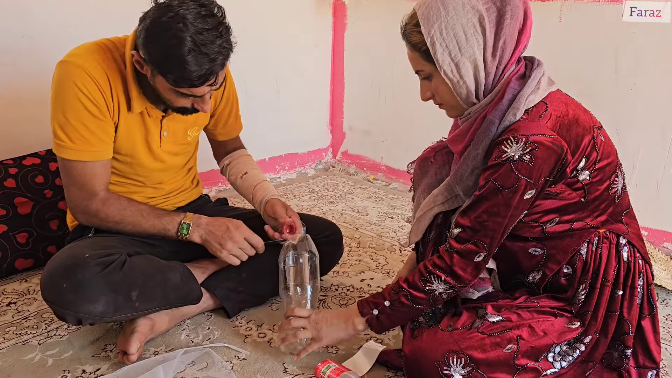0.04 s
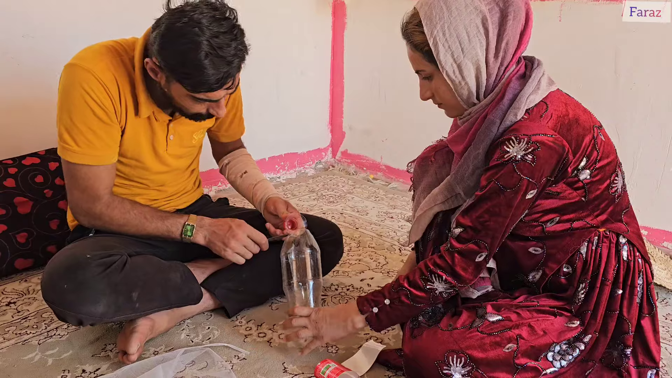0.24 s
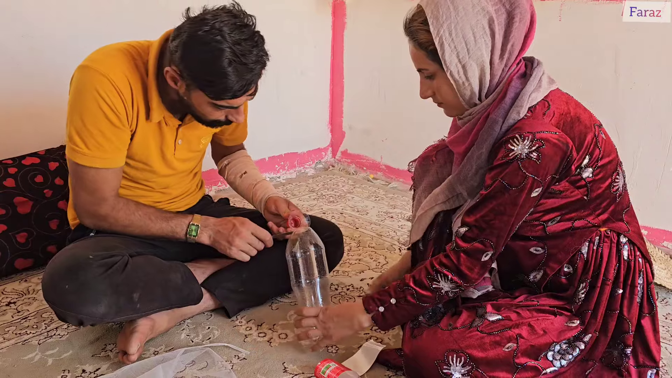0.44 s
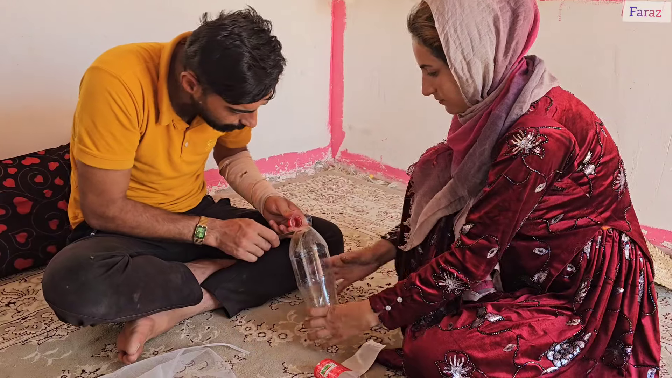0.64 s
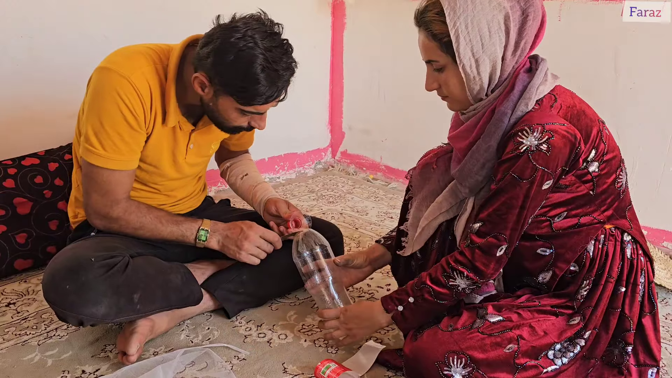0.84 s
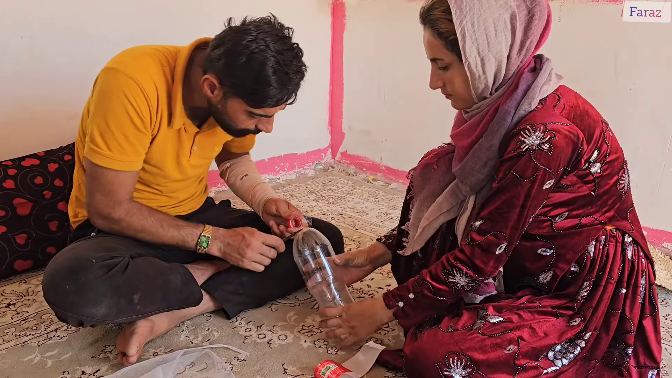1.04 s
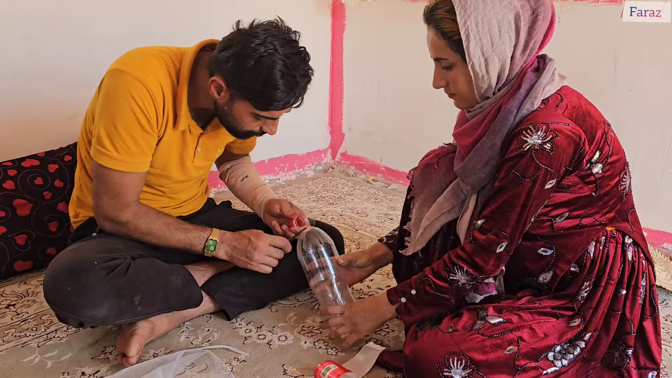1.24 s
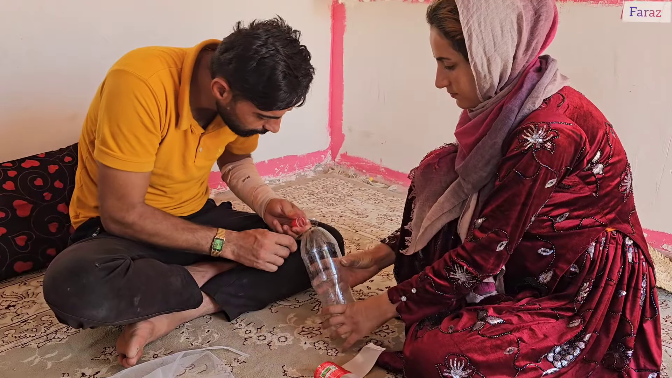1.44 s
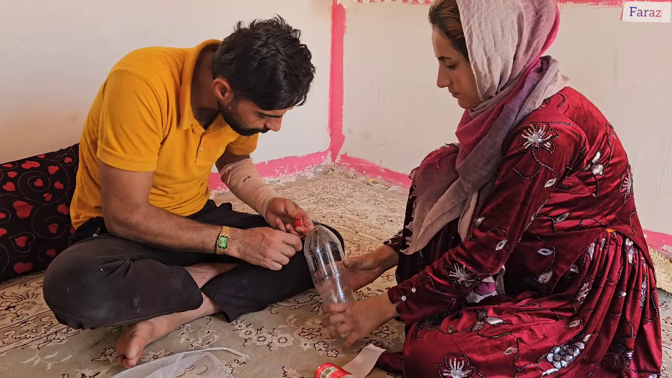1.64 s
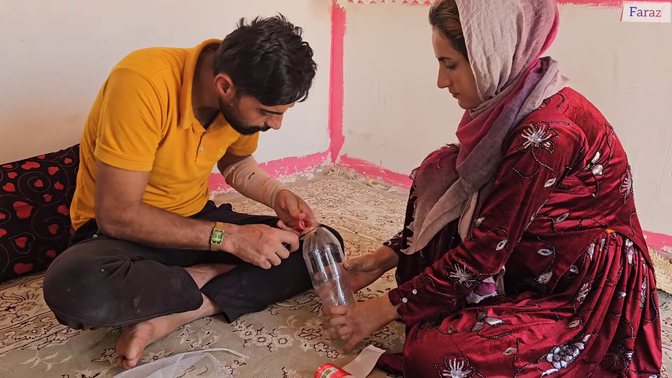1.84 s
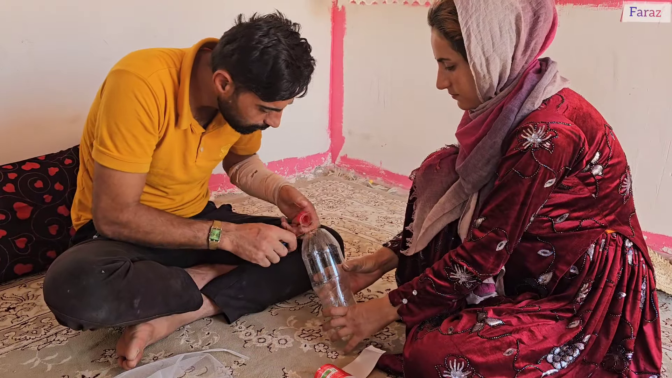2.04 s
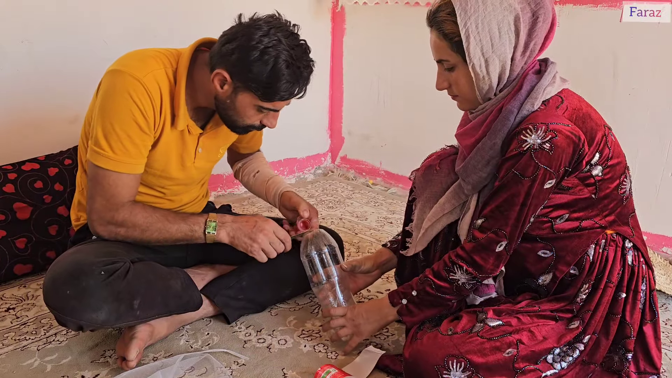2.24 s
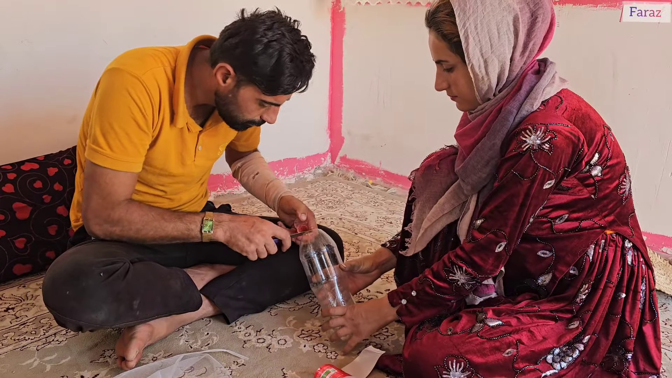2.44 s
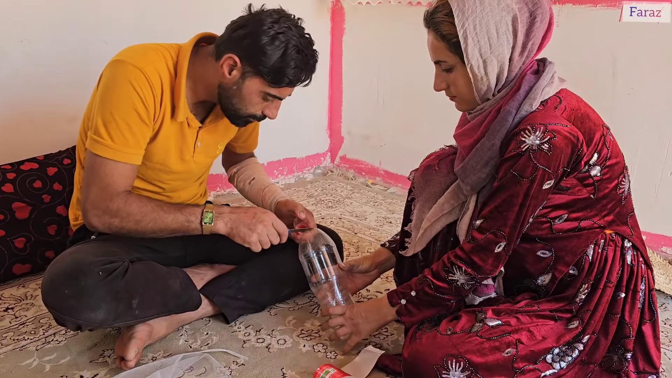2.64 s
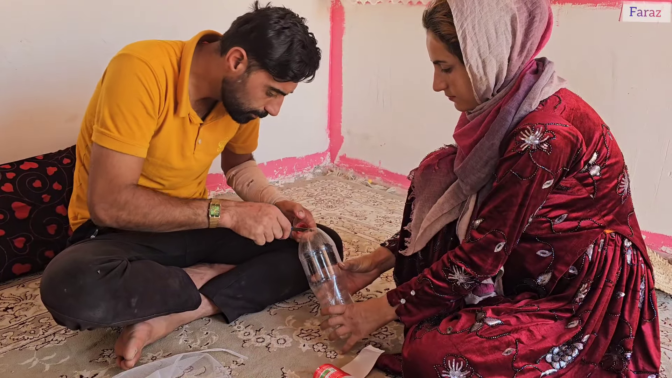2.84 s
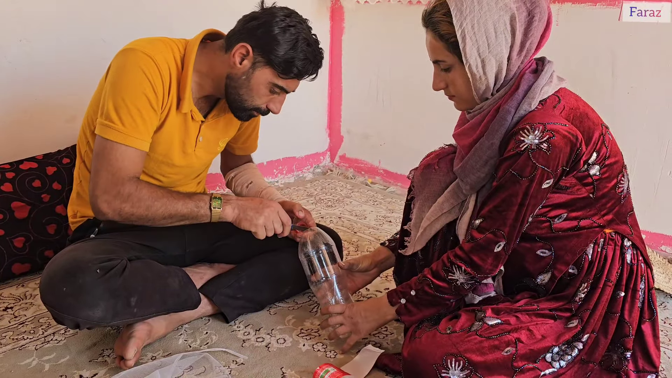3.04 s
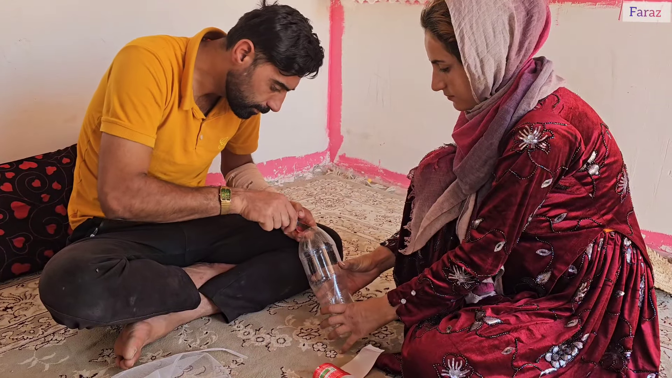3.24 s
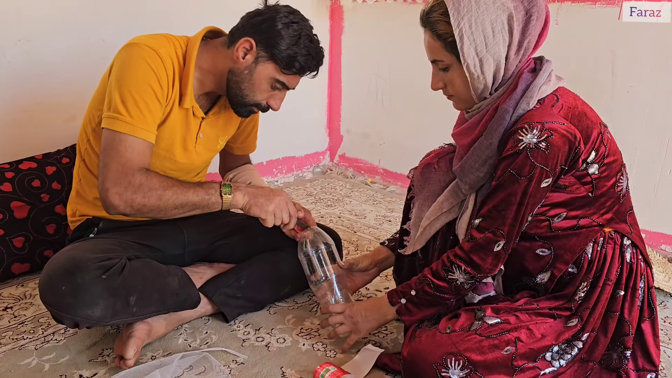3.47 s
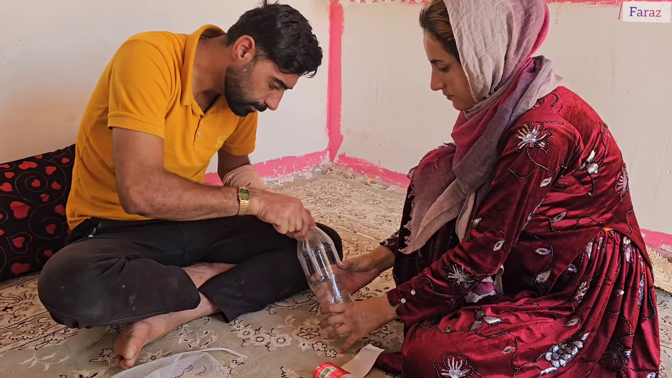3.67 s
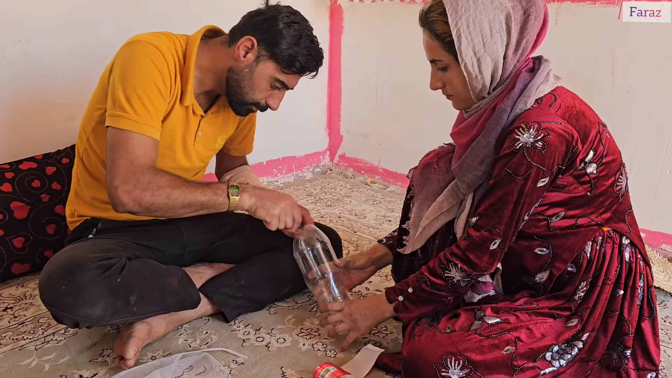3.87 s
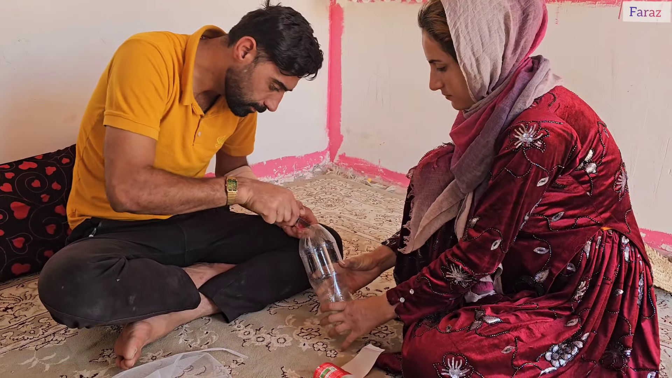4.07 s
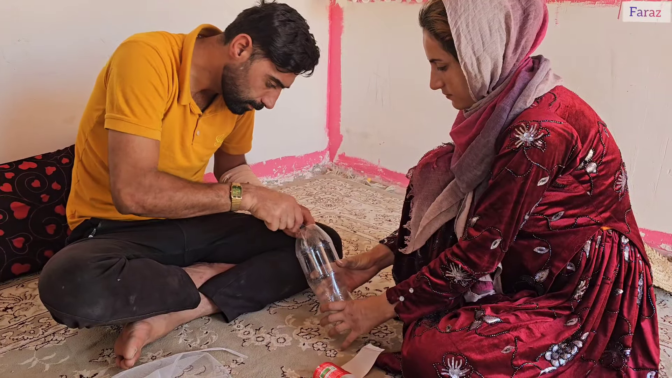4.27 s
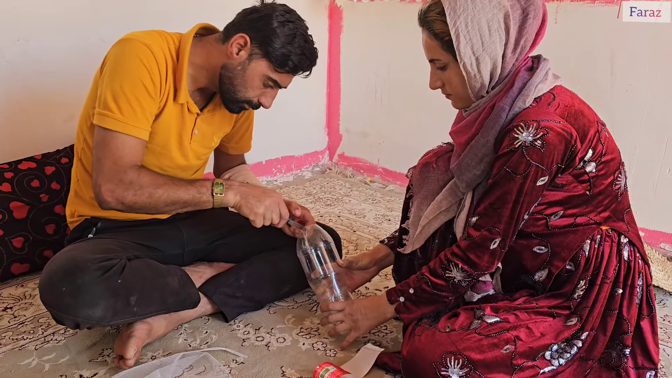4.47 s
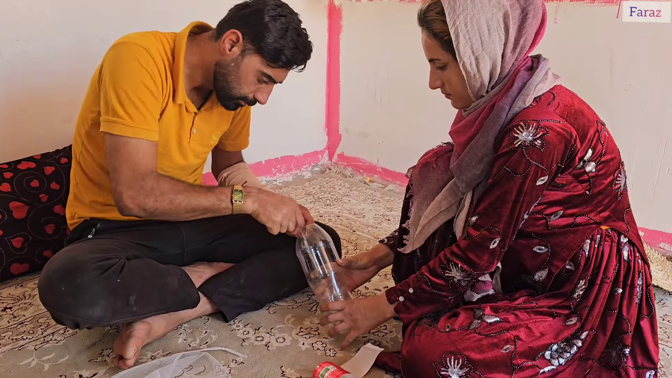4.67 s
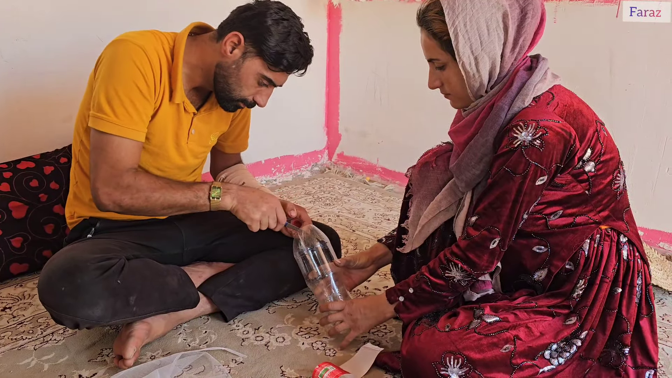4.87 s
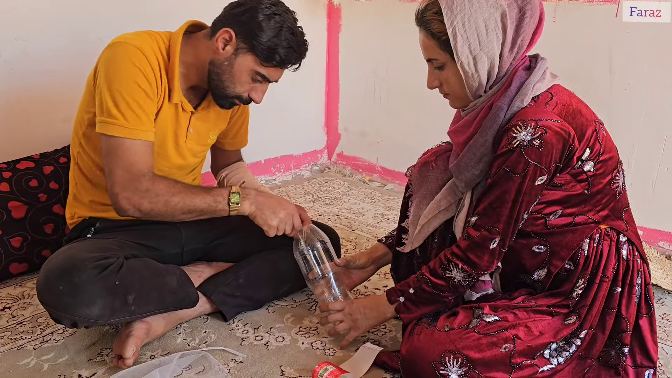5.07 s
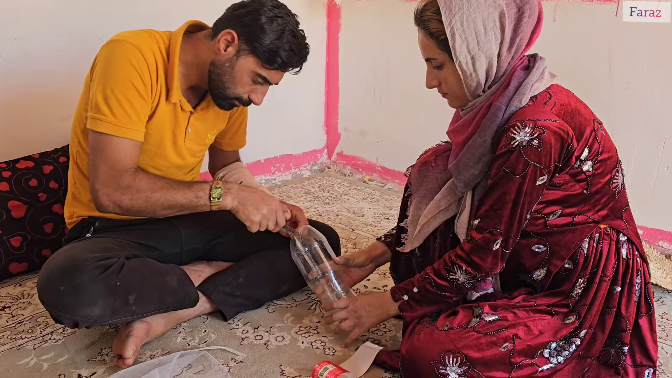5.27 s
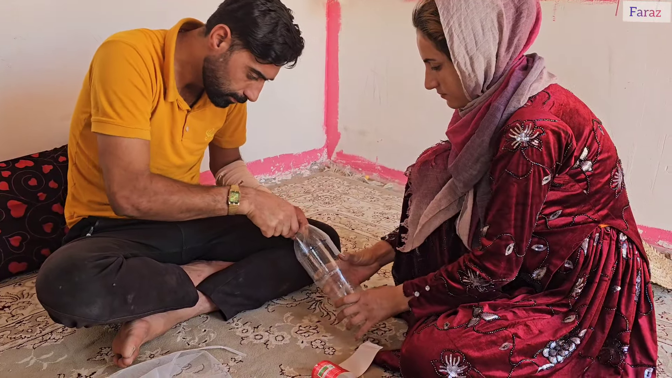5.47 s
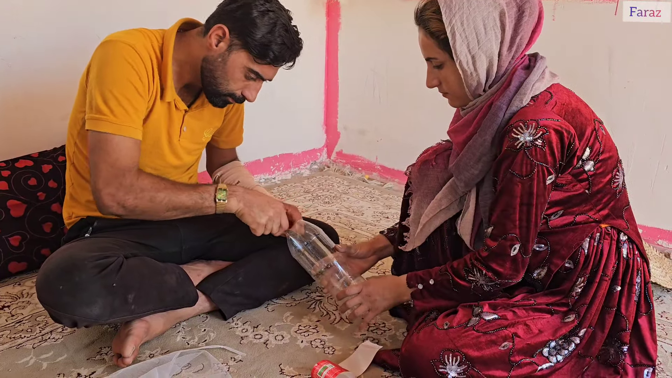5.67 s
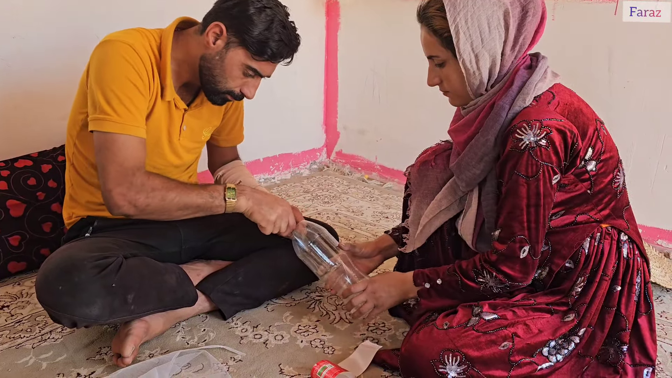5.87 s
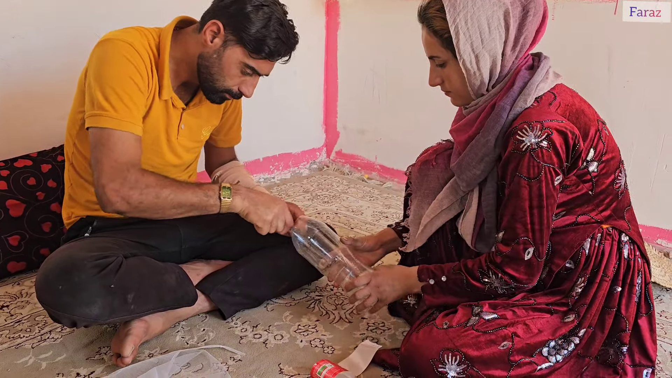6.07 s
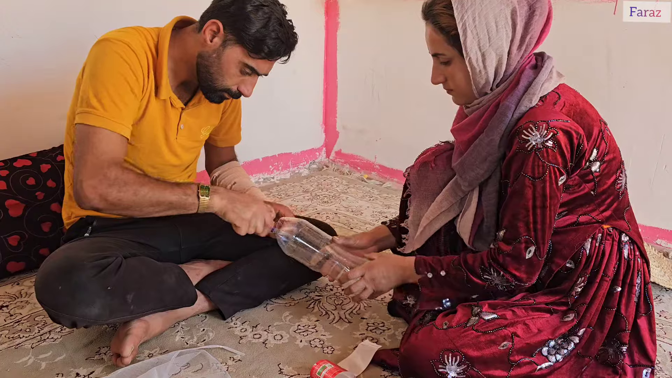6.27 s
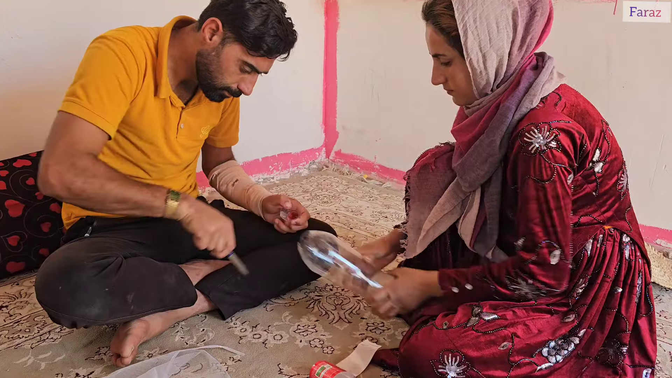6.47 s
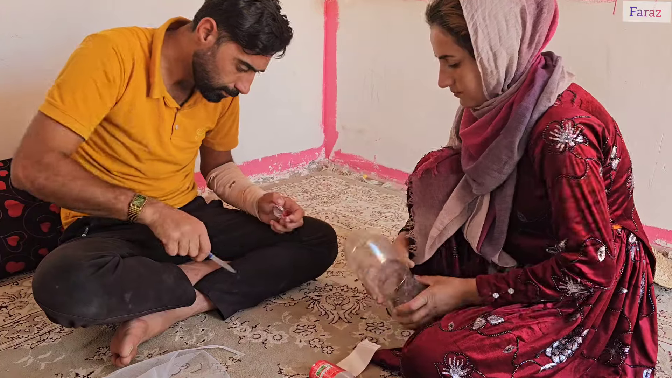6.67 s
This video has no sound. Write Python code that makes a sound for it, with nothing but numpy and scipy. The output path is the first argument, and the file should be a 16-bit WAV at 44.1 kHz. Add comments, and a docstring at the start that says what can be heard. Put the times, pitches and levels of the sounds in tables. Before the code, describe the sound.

A quiet small room with a faint stereo hush. From 0 to 0.6 s a blade and hands brush an empty plastic bottle almost inaudibly. Small knocks come at about 0.7 and 0.8 s, and a clear hollow click at 1.24 s. Soft low bumps and faint rubbing continue to 2.3 s, where a light scrape-tick falls, then a few dull creaks and touches. At 3.13 s a short toothy buzz sounds, with ticks near 3.4. From 3.54 s loud fast sawing starts: gritty rasps four or five times a second, with a bright snap at 3.85, each stroke making the air inside hum low and hollow. It runs to about 5.5 s. After a brief lull, uneven catches, pops and crackles from 5.85 s break through, with a boomy crunch at 6.36 and a crisp snap at 6.55 s, fading into hush.

```python
"""A serrated knife saws into the shoulder of an empty plastic bottle: teeth pluck the wall, rubbing is noise.
Hands and blade first only feel around; then come fast strokes, and the blade breaks through with snaps.
Plucks, noise and blows drive resonances of wall, rim, panels, blade and air; the air booms higher once slit.
Sine notes sing in the neck. A small bare room answers with decaying noise over a quiet stereo hush."""
import sys
import numpy as np
from scipy import signal
from scipy.fft import rfft, irfft, next_fast_len
from scipy.io import wavfile
from scipy.ndimage import uniform_filter1d, map_coordinates

SR = 44100
rng = np.random.default_rng(int(sys.argv[2]) if len(sys.argv) > 2 else 0)


def generate_wav(sig):
    """Save sig (samples, or channels by samples) to the path in sys.argv[1] as 16-bit PCM at SR."""
    pcm = np.round(np.clip(np.atleast_2d(sig).T, -1, 1) * 32767).astype(np.int16)
    wavfile.write(sys.argv[1], SR, pcm)


N = 295911


def amp(db):
    """Gain of a level in dB."""
    return 10 ** (np.asarray(db) / 20)


def unit(x):
    """Scaled to rms 1."""
    return x / np.sqrt(np.mean(x ** 2) + 1e-20)


def along(points, hz):
    """(f/Hz, value) points interpolated on a log frequency axis."""
    f, v = np.transpose(points)
    return np.interp(np.log(hz + 1), np.log(f + 1), v)


def filtered(x, response):
    """x times a complex response of frequency."""
    m = next_fast_len(N + SR // 2)
    return irfft(rfft(x, m) * response(np.fft.rfftfreq(m, 1 / SR)), m)[..., :N]


def through(x, shape):
    """x through a response normalized to leave white noise at its level."""
    def normalized(hz):
        gain = shape(hz)
        return gain / np.sqrt(np.mean(np.abs(gain) ** 2))
    return filtered(x, normalized)


def modes(table):
    """Causal response of parallel resonances with alternating signs."""
    def response(hz):
        total = 0
        for k, (center_hz, width_hz, db) in enumerate(table):
            damping = 1j * hz * width_hz
            total = total + (-1) ** k * amp(db) * damping / (center_hz ** 2 - hz ** 2 + damping)
        return total
    return response


def wobble(rate):
    """Smooth random curve, rate knots/s."""
    knots = rng.standard_normal(int(N * rate / SR) + 4)
    return map_coordinates(knots, [np.arange(N) * rate / SR])


def wavering(depth):
    """Time in s that runs slightly unevenly, so that tones waver in pitch."""
    return np.cumsum(1 + depth * wobble(rate=44)) / SR


def joined(tables):
    """Per-sample columns of successive tables; each holds its last row until the next starts."""
    rows = []
    for table, after in zip(tables, tables[1:] + [[(N / SR,)]]):
        hold_end_s = max(after[0][0] - 1 / 2000, table[-1][0])
        rows += [*table, (hold_end_s, *table[-1][1:])]
    s, *cols = np.transpose(rows)
    return [np.interp(np.arange(N) / SR, s, c) for c in cols]


# hush spectrum: f/Hz, relative density/dB
HUSH_SPECTRUM = [(12, -37), (20, 5), (49, 1.5), (241, 7), (678, -13.5), (825, -2), (923, -9.5), (2140, -10),
                 (2530, -15.5), (2910, -13), (7310, -15), (10800, -36), (16000, -21)]
HUSH_MID_DB = -71


def hush():
    """Quiet room and microphone: shaped noise, near mono in the bass, unrelated in the treble."""
    mid, side = through(rng.standard_normal((2, N)), lambda hz: amp(along(HUSH_SPECTRUM, hz)))
    side = filtered(side, lambda hz: hz / (hz + 400))
    return amp(HUSH_MID_DB) * np.array([mid + side, mid - side])


# room over direct sound: f/Hz, level/dB
WET_LEVEL = [(60, -22), (300, -17), (560, 0), (1200, -6), (3000, -3), (8000, 3)]
# room decay: f/Hz, t60/s
ROOM_T60 = [(200, 0.22), (1000, 0.082), (4000, 0.062), (12000, 0.031)]


def room(x):
    """Diffuse answer of the walls: decaying noise, a new tail for every short stretch of sound."""
    x = filtered(x, lambda hz: amp(along(WET_LEVEL, hz)))
    out, step = np.zeros((2, N + SR)), SR // 4
    fade = np.interp(np.arange(step + 256), [0, 256, step, step + 256], [0, 1, 1, 0])
    predelay = 200  # samples
    for at in range(0, N, step):
        hz, t, z = signal.stft(rng.standard_normal((2, SR // 3)), SR, nperseg=256)
        decay = amp(-60 * t / along(ROOM_T60, hz)[:, None])
        tail = signal.istft(z * decay, SR, nperseg=256)[1]
        tail = tail / np.linalg.norm(tail[0])
        piece = x[at:at + len(fade)]
        piece = piece * fade[:len(piece)]
        wet = signal.fftconvolve(piece[None], tail, axes=1)
        start = at + predelay
        out[:, start:start + wet.shape[1]] += wet
    return out[:, :N]


# notes of the air in the neck: loudest t/s, nominal f/Hz, nominal level/dB, swell/(dB/s), fade/(dB/s)
NECK_NOTES = [(0.666, 217.7, -47.5, 300.4, 63.7), (0.826, 225, -52, 1000, 500),
              (0.862, 217.6, -52, 756, 83.7), (1.17, 217, -56, 89.5, 163.4),
              (1.238, 218.9, -47.5, 3074, 148.1), (1.5, 210, -42.5, 136, 187),
              (1.64, 208.8, -47, 269.9, 151), (1.72, 214, -51, 149, 60.7), (1.79, 212, -62, 200.3, 220),
              (1.85, 350, -72, 199.7, 59.5), (2.08, 348, -55, 201.7, 120.4), (2.13, 214, -55, 60.1, 69.6),
              (2.326, 203.2, -51, 833.3, 157.4), (2.558, 219, -51, 74.5, 480.5),
              (2.76, 216.6, -45, 151.1, 65.07), (2.916, 213, -45, 69.7, 75.2),
              (3.0, 381, -52.5, 79.9, 100.1), (3.132, 271.8, -39.5, 3000, 1018),
              (3.192, 239, -36, 938, 648.1), (3.19, 256.4, -43, 461.3, 239.3),
              (3.431, 255.6, -45, 324.4, 268.9), (3.55, 257.8, -30.5, 2993, 100),
              (3.677, 262.7, -19.5, 237.6, 210.3), (3.858, 264.5, -25, 2000, 600),
              (3.909, 264.6, -33, 925.9, 198.1), (4.054, 254.2, -29.5, 925.9, 100),
              (4.096, 259, -33.5, 299.9, 299.6), (4.22, 258.5, -31.5, 89.9, 287.3),
              (4.27, 252, -25, 859.6, 472.7), (4.372, 254.4, -33, 94.1, 383.6),
              (4.49, 259.3, -25.5, 504.5, 85.43), (4.594, 258.8, -32, 765.2, 219),
              (4.71, 254.7, -20, 920, 164.8), (4.775, 269, -36, 215.8, 229.8),
              (4.952, 259.7, -30.5, 401.3, 188.7), (5.051, 262, -26, 702, 247.3),
              (5.154, 258.7, -29.5, 1500, 119.8), (5.215, 262, -26, 400, 299.6),
              (5.265, 265, -32, 287.1, 474), (5.397, 259.3, -20, 1800, 250),
              (5.581, 252.3, -40, 585.3, 935), (5.617, 268, -36.5, 2914, 130.3),
              (5.701, 264, -40.5, 200.3, 800), (5.802, 268.7, -70, 215, 194.6),
              (5.862, 263.9, -24.5, 3000, 199.8), (5.887, 262.6, -29, 400, 260),
              (6.087, 261.8, -23, 324, 500.2), (6.163, 239.7, -36, 400, 474),
              (6.332, 240.8, -46, 198.1, 1008), (6.362, 261.3, -16, 6000, 456),
              (6.405, 267.2, -22.5, 500, 698.7), (6.436, 281.8, -42, 277.8, 216),
              (6.575, 287.8, -23.5, 750, 587.7), (6.633, 280.7, -35, 190.6, 377.3)]


def notes():
    """Air in the neck sings: sines swell to their loudest moment and fade, fluttering a little."""
    out, t, clock = np.zeros(N), np.arange(N) / SR, wavering(depth=.02)
    for s, hz, db, swell, fade in NECK_NOTES:
        on = slice(round(s * SR) - SR // 4, round(s * SR) + SR // 4)
        level_db = db + 0.5 - np.maximum(swell * (s - t[on]), fade * (t[on] - s))
        out[on] += np.sqrt(2) * amp(level_db) * np.sin(2 * np.pi * hz * clock[on])
    return out * amp(1.23 * wobble(rate=34))


# resonances, all: f/Hz, width/Hz, relative level/dB
AIR_WHOLE_MODES = [(212, 79, -5.5), (294, 73.5, -2), (163, 56, -9), (81, 31, -7)]
AIR_SLIT_MODES = [(262.5, 68.5, -2.5), (217.2, 62.6, 0), (187.5, 38.6, -3.5), (95.6, 49, -12.5)]
AIR_CUT_MODES = [(240.7, 33, -5), (293.4, 31, 0), (205, 51.4, -2), (125, 160, -13.5)]
WALL_MODES = [(813, 7.6, 4), (1160, 17, -2.5), (1120, 260, -4), (1340, 96, -8.8), (1478, 46, 7)]
SNAP_MODES = [(753, 340, -1), (1390, 915, 2.6), (2118, 448, -0.5)]  # the bent wall springs back
PANEL_MODES = [(352, 43.6, 5), (410, 87, 1), (468, 17.5, 2), (502, 58, -8.5), (625, 105, -7.5)]
RIM_MODES = [(2200, 570, -6.5), (2623, 45, 6.5), (2900, 810, -1.5), (3245, 13.4, 4.5)]  # driven by hard steel contact
BLADE_MODES = [(4280, 430, -11), (7330, 540, 13)]
# blade on plastic: f/Hz, relative density/dB
EDGE_SPECTRUM = [(1470, 4.5), (2500, -30), (2740, -32), (3060, 0.5), (4480, 7), (6700, -0.5), (7530, -12),
                 (10300, -24.5), (11500, -9.5), (16000, -25)]
# wall opens, then slit gapes wide: start t/s, end t/s
SLIT_SPAN_S = (2.72, 3.6)
CUT_SPAN_S = (5.62, 6.06)


def bottle(wall_force, rim_force, panel_force, air_force, edge_force):
    """Forces ring the shoulder, the cut rim, the soft side panels, the air inside and the blade."""
    t = np.arange(N) / SR
    slit = np.interp(t, SLIT_SPAN_S, [0, np.pi / 2])  # crossfade angles
    cut = np.interp(t, CUT_SPAN_S, [0, np.pi / 2])
    whole = through(air_force, modes(AIR_WHOLE_MODES))
    opened = through(air_force, modes(AIR_SLIT_MODES))
    gaping = through(air_force, modes(AIR_CUT_MODES))
    air = np.cos(slit) * whole + np.sin(slit) * (np.cos(cut) * opened + np.sin(cut) * gaping)

    edge = through(edge_force, lambda hz: amp(along(EDGE_SPECTRUM, hz)))
    edge = edge + 0.41 * through(edge_force, modes(BLADE_MODES))
    wall = .95 * through(wall_force, modes(SNAP_MODES)) + .4 * through(wall_force, modes(WALL_MODES))
    panels = through(panel_force, modes(PANEL_MODES))
    rim = through(rim_force, modes(RIM_MODES))

    def soft(top_hz):  # plastic yields: little treble
        return lambda hz: 1 / (1 + 1j * hz / top_hz) ** 2
    plastic = 1.178 * filtered(wall + panels + air, soft(top_hz=2630))
    return plastic + filtered(rim, soft(top_hz=5700)) + edge


def hardness(edge_db):
    """Rim force gain: the more the edge hisses, the harder the contact."""
    return amp(np.clip(0.87 * (edge_db + 13.5), -18, 4) - 7)


# blade lands, catches or snaps through:
# t/s, nominal peak level/dB, snap f/Hz, then boom, panel, edge: nominal level/dB re peak
BLADE_KNOCKS = [(0.669, -43.5, 1324, 10, 14.5, -25), (0.817, -34.5, 1300, -4, -4, -9.5),
                (1.18, -56.5, 1450, -11, -5, 12), (1.237, -20, 1370, -10.5, 0, -24.5),
                (2.313, -31.5, 1111, -32, -22, -21), (2.43, -54, 1500, 6, -5, 4),
                (2.447, -46.5, 2150, 5, -12, 2), (2.715, -34.5, 1891, -5, -22, 5.5),
                (3.131, -42, 1398, 7, -10, -13), (3.148, -28, 1400, -5, -11, -22.5),
                (3.366, -35.5, 1045, -2, -19, -17), (3.414, -29.5, 1525, -9, 2, -23),
                (3.541, -23, 1072, -3, 4.5, -19), (3.551, -32, 1400, 5, -17, -33),
                (3.56, -16.5, 1440, -21, -7, -30), (3.744, -25.5, 1214, 6.5, 1, -16),
                (3.849, -11.5, 1406, -9.5, -28, -22), (4.041, -22.5, 1400, 1, 3, -13),
                (4.25, -20.5, 1259, 1.5, -8, -12), (4.474, -22.5, 1897, 2.5, -11, -19.5),
                (4.683, -26.5, 1230, 2.5, 1, -10), (4.913, -28, 1604, -3, -12, -18),
                (5.385, -22, 1486, -2, 2, -33), (5.561, -35.5, 1926, 5, -10, -14.5),
                (5.617, -28, 1670, 6, -5, -11.5), (5.855, -24, 1891, -4, 7, -12),
                (5.866, -29.5, 2253, -9, -10, -11), (5.879, -26.5, 1400, -6, -11, -9),
                (5.887, -39, 1068, 13, -9, -16), (5.949, -60, 1595, 2, 0, -5),
                (6.025, -22.5, 1280, 1.5, 3, -14.5), (6.069, -23.5, 1407, 6.5, 3, -15),
                (6.077, -20, 1044, -1, 5, -8), (6.19, -49.5, 1542, 13.5, -6, 2.5),
                (6.295, -22, 1580, -5, -13, -1.5), (6.358, -23.5, 1524, 18.5, -11, 13.5),
                (6.553, -17.5, 1560, -4.5, -33, -37), (6.65, -50, 1259, -1, -7, 11.5)]


def knocks():
    """A sharp snap of its own pitch, a blow on wall, rim, panels and air, and a crackle from the edge."""
    forces, snaps, t = np.zeros((5, N + SR)), np.zeros(N + SR), np.arange(SR // 10) / SR
    for s, db, hz, boom_db, panel_db, edge_db in BLADE_KNOCKS:
        at = round(s * SR)
        on = slice(at, at + len(t))
        snap_envelope = amp(db - 0.5 - 60 * t / 0.008) * (1 - np.exp(-t / 0.0002))
        snaps[on] += snap_envelope * np.sin(2 * np.pi * hz * t)
        crackle_envelope = amp(db + edge_db - 7.0 - 60 * t / 0.019)
        forces[4, on] += crackle_envelope * rng.standard_normal(len(t))
        blow = amp([db + 6.5, db + 14.5, db + panel_db + 9.5, db + boom_db + 19])
        forces[:4, at] += blow * [1, hardness(edge_db - 1), 1, 1]
    return snaps[:N] + bottle(*forces[:, :N])


def teeth(rate, jitter, scatter_db, life_s):
    """Tooth plucks at the rate at which teeth pass, and the chatter that dies after each."""
    draws = rng.standard_normal((N // 40, 2))
    passed = np.flatnonzero(np.diff(np.floor(np.cumsum(rate / SR))))
    uneven, draws = jitter[passed], draws[:len(passed)]
    at = passed + uneven * SR / rate[passed] * draws[:, 0]
    at = np.clip(at, 0, N - 1).astype(int)
    plucks = np.bincount(at, amp(scatter_db * uneven * draws[:, 1]), N)
    chatter = signal.lfilter([1], [1, -np.exp(-1 / (life_s * SR))], plucks)

    def steady(x):  # level evened over 40 ms
        return x / np.sqrt(np.abs(uniform_filter1d(x ** 2, SR // 25)) + 1e-9)
    return steady(plucks), steady(chatter)


def patchy(x, depth_db):
    """Colour that drifts as the blade moves along the wall."""
    z = signal.stft(x, nperseg=128)[2]
    field = uniform_filter1d(rng.standard_normal(z.shape), size=2, axis=0)
    field = uniform_filter1d(field, size=30, axis=1)
    return signal.istft(z * amp(depth_db * unit(field)), nperseg=128)[1][:N]


# movements of blade or hand: start t/s, rise/s, hold/s, fall/(dB/s) before FALL_PACE,
# entry level/dB under top before ENTRY_SHARE, rasp nominal level/dB at top,
# then boom, panels, edge hiss, shoulder ring: nominal level/dB re rasp
BLADE_STROKES = [ (0.0, 0.0048, 0.0041, 410, 1.8, -60.5, -21, -7, 1.5, -27),
                 (0.089, 0.065, 0.0093, 200, 16.5, -75.5, -3, -1, 0.5, -30),
                 (0.222, 0.011, 0.011, 400, 10.5, -73, -11, -9, 3.5, -30),
                 (0.262, 0.069, .02, 130, 4.5, -72, 10.5, -1, 1.5, -30),
                 (0.48, 0.13, 0.014, 202.4, 16.2, -66.5, 7.5, 0, -0.5, -30),
                 (0.632, 0.038, 0.0053, 159.1, 10.9, -57, 10.5, 3.5, -2, -30),
                 (0.817, .002, .002, 330, 1, -54, -6, 7.5, -9, -30),
                 (0.92, 0.055, 0.079, 221, 6, -71, 8, 1, -4, -30),
                 (1.089, .03, .05, 148.5, 8.7, -70, 17, 7.5, -11, -23),
                 (1.18, 0.0022, 0.0054, 170, 1, -67.5, 13, -9, 1.5, -30),
                 (1.236, .002, 0.0023, 420, 1, -40, -1.5, 1, -29, -23),
                 (1.41, 0.063, 0.019, 130, 15.4, -63, 13.5, 8.5, -6, -25),
                 (1.619, 0.029, 0.0086, 130, 14, -62, 17.5, 3, -6, -30),
                 (1.739, 0.023, 0.016, 350, 3, -73, -11, 6, -3, -46),
                 (1.929, 0.031, 0.0044, 271.6, 14.8, -77.5, 7, 5, -6, -36),
                 (2.0, 0.027, 0.011, 170.7, 23.2, -68, 9, 10.5, -4, -32),
                 (2.115, 0.062, 0.0049, 352.7, 14, -69, 14, 7, 0, -28),
                 (2.249, 0.017, 0.019, 199.1, 15, -73, -7, -3, -3, -30),
                 (2.292, 0.0033, 0.013, 298, 4, -70, -5, 0, 8, -30),
                 (2.309, .006, .012, 300, 5.8, -47.5, -2, -6.5, -34, -24),
                 (2.43, 0.024, 0.0028, 300.4, 11.3, -54, 6.5, -2.5, -19, 1),
                 (2.509, 0.0091, 0.0096, 151, 6.1, -58, 11.5, 5.5, 0, -15),
                 (2.56, 0.019, 0.12, 202, 2, -65, 4, 4, -5.5, -27),
                 (2.704, 0.02, .01, 168.7, 8.8, -45.5, 9.5, 6.5, -3.5, -18),
                 (2.845, .028, 0.027, 240.1, 4, -52, 14.5, 9.5, -5, -11),
                 (3.072, 0.016, 0.011, 120.3, 13.5, -65.5, 15, 12, -20, -37),
                 (3.13, .02, .062, 430, 6, -48, 0, -5, -19, -8),
                 (3.34, .015, .012, 400, 12, -69, 11, 5, -12, -20),
                 (3.367, 0.0019, 0.0026, 328.8, 0.95, -51.5, -3, 1, -28, -16),
                 (3.415, 0.0022, 0.0085, 380.5, 1.1, -50, 4, -2, -25, -6),
                 (3.541, 0.053, 0.05, 420.2, 7.7, -28, 0, 1, -11.5, -8),
                 (3.745, 0.0019, .005, 230.3, 0.99, -39.5, 0, 4.5, -11.5, -15),
                 (3.778, .013, .005, 251, 5.3, -42, 11.5, 8.5, 1.5, -20),
                 (3.848, .038, .035, 261.4, 3.92, -30.5, 5, 3, -11.5, -13),
                 (4.04, 0.074, 0.027, 220.2, 6.65, -33, 3.5, 3, -6, -4),
                 (4.25, 0.02, 0.058, 220.3, 3.95, -35, 9, 7, -8.5, -13),
                 (4.474, .08, .02, 298.7, 10, -29.5, 1.5, -1.5, -10, -16),
                 (4.684, .03, 0.057, 249.5, 5.6, -41, 12, 6, -7.5, -16),
                 (4.86, 0.027, 0.0053, 403, 4.15, -56, 6, 5.5, -14, -18),
                 (4.912, 0.045, 0.048, 282.1, 8.2, -40, 8.5, 2.5, -5.5, -11),
                 (5.08, 0.079, 0.05, 301.8, 18, -42, 13.5, 5.5, -7.5, -23),
                 (5.385, .004, 0.046, 333.6, 1.07, -38.5, 2, 2, -10, -24),
                 (5.56, 0.023, 0.0019, 549, 5.17, -54, 6.5, 0, -4, -24),
                 (5.618, 0.0022, 0.0034, 398.3, 1.12, -45.5, 15, 1.5, -6.5, -34),
                 (5.74, 0.069, 0.012, 182.1, 18.4, -68, 23, 0, 0, -20),
                 (5.855, 0.0019, 0.027, 380.4, 0.8, -43.5, 12.5, 4, -12, -5.5),
                 (5.94, 0.011, .07, 200, 1, -65.5, 15, -2, 0.5, -20),
                 (6.025, .002, 0.0034, 348.5, 1.14, -40, 13.5, -1, -15, -20),
                 (6.066, .012, 0.0061, 451.4, 13.55, -35.5, 7, -4, -12, -6),
                 (6.296, .002, 0.0054, 181.3, 0.95, -38.5, 0, 2, -2.5, -20),
                 (6.34, 0.0052, .01, 512.4, 4.2, -41, 10, -6, -1.5, -20),
                 (6.357, 0.0022, 0.0027, 319.3, 1, -36, 18, 1, -0.5, -10),
                 (6.553, 0.0014, 0.0019, 752.5, 0.92, -39, 5, -1, -22.5, 5),
                 (6.59, 0.011, 0.019, 173.3, 0.89, -58.5, 8, -3, -13, -3),
                 (6.654, 0.048, 0.013, 197.6, 6.5, -58, 7, 3, -2, -18), ]
# per layer (rasp, boom, panels, edge, ring): fall factor; the air dies slowest
FALL_PACE = (1, 0.46, 1, 1, 0.67)
# per layer: share of the entry followed
ENTRY_SHARE = (1, 0.64, 0.92, 0.97, 1.5)
# per layer, blade trailing on lightly: level/dB re top
TRAIL_LEVEL_DB = (-20, -18, -17.5, -20, -62)
TRAIL_PACE = .3  # trail fall over main fall


def movements(size=8):
    """Levels in dB of rasp, boom, panels, edge and ring: each movement rises, holds, falls and trails off."""
    power, t = np.full((5, (N + SR) // size), 1e-14), np.arange(0, SR // 2, size) / SR
    for s, rise, hold, fall, entry_db, rasp_db, *above_db in BLADE_STROKES:
        falling_db = np.outer(FALL_PACE, fall * np.maximum(t - rise - hold, 0))
        entering_db = np.outer(ENTRY_SHARE, entry_db * np.maximum(1 - t / rise, 0))
        top_db = rasp_db + np.array([0, *above_db])[:, None] - entering_db
        trail_db = np.c_[list(TRAIL_LEVEL_DB)] - TRAIL_PACE * falling_db
        decay_power = amp(-2 * falling_db) + amp(2 * trail_db)
        power[:, round(s * SR / size):][:, :len(t)] += amp(2 * top_db) * decay_power
    return np.repeat(10 * np.log10(power), size, axis=1)[:, :N]


# blade meets wall, a list of tables: t/s, pluck share/0-1 at speed, most teeth/s, unevenness/0-1
BLADE_BITE = [
    [(0, .3, 300, .3)],
    [(3.13, .99, 108, .05)],
    [(3.36, .3, 300, .3)],
    [(3.541, .96, 250, .26)],
]
RING_HZ = 823  # the shoulder's clearest mode


def sawing():
    """Each movement rasps with teeth and rubbing; the share of plucks is highest near its top."""
    rasp_db, boom_db, panel_db, edge_db, ring_db = movements()
    peak_db, = joined([[(k[0], k[5])] for k in BLADE_STROKES])
    speed = np.clip(amp(.6 * (rasp_db - peak_db)), .3, 1)  # relative to each movement's top
    bite, top_rate, jitter = joined(BLADE_BITE)
    bite = bite * np.clip(3 * speed - .8, 0, 1)  # rubbing takes over as the movement slows
    plucks, chatter = teeth(top_rate * np.sqrt(speed), jitter, scatter_db=15, life_s=.0012)
    rub = rng.standard_normal((4, N))
    wall, panel = np.sqrt(bite) * plucks + np.sqrt(1 - bite) * rub[:2]
    edge = rub[2] * (0.41 * bite * chatter + 1 - 0.47 * bite)
    wall, edge = patchy(wall, depth_db=2.5), patchy(edge, depth_db=1.5)

    grip_db = 2.2 * wobble(rate=110)  # uneven hand pressure
    wall = amp(rasp_db - 2.0 + grip_db) * wall
    rim = hardness(edge_db - rasp_db) * wall
    panel = amp(panel_db - 3.5) * panel
    air = amp(boom_db - 3.5) * rub[3]
    edge = amp(edge_db) * amp(1.02 * grip_db) * edge
    ring_gain = amp(ring_db + 3.3 * wobble(rate=40))
    ring = ring_gain * np.sin(2 * np.pi * RING_HZ * wavering(depth=0.012607))
    return ring + bottle(wall, rim, panel, air, edge)


# left port over right: f/Hz, level/dB
PORT_TILT = [(100, 1), (1300, 1.8), (2400, 3), (4400, -9.5), (8000, -5), (15000, 3.5)]
# left port ahead of right: f/Hz, phase/rad
PORT_LEAD = [(60, 0), (1000, .2), (2700, .6), (4700, 2.2), (7000, 3.5), (9000, 6), (12000, 10), (16000, 14)]
BASS_HZ = 69  # corner of each of the microphone's three high-pass stages


def scene():
    """The bottle reaches the two microphone ports directly and by the room."""
    near = amp(-2.0) * (sawing() + knocks() + notes())
    near = filtered(near, lambda hz: (1j * hz / (BASS_HZ + 1j * hz)) ** 3)
    half = np.array([[.5], [-.5]])  # left, right

    def port_response(hz):
        return amp(half * along(PORT_TILT, hz)) * np.exp(1j * half * along(PORT_LEAD, hz))
    ports = filtered(near, port_response)
    return ports + room(near) + hush()


TOP_HZ = 15900


def record(dry):
    """Band limit: nothing passes from TOP_HZ up."""
    return filtered(dry, lambda hz: hz < TOP_HZ)


dry = scene()
out = record(dry)
generate_wav(out)
```